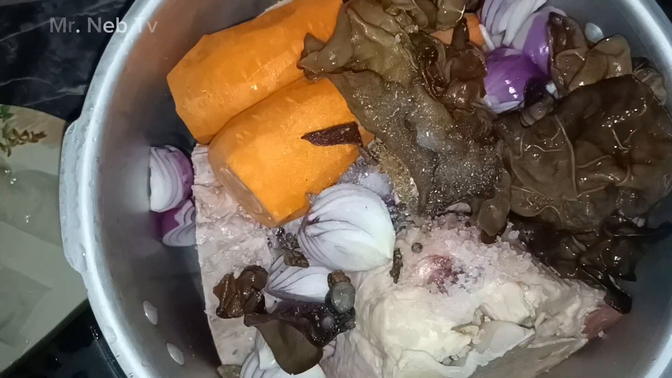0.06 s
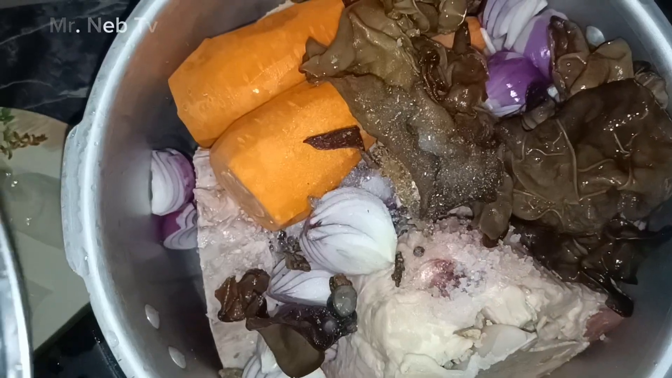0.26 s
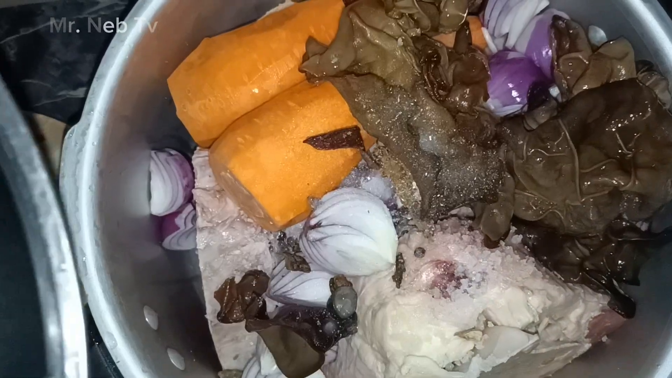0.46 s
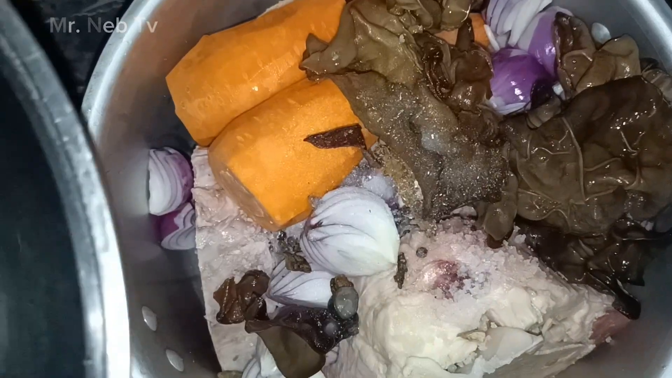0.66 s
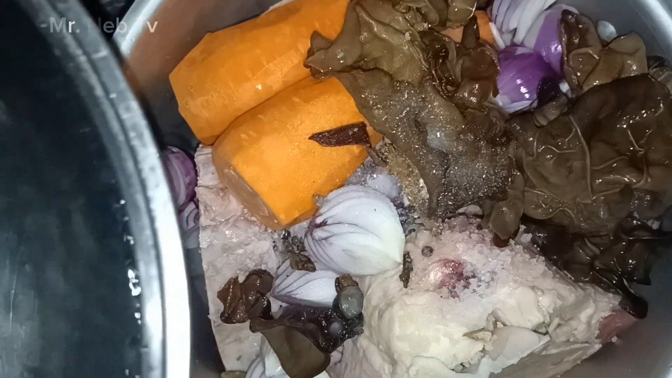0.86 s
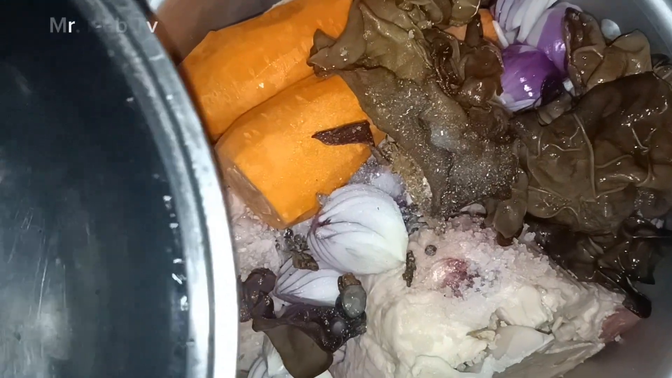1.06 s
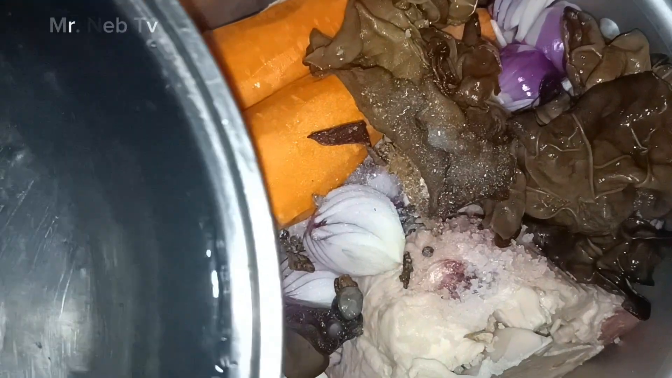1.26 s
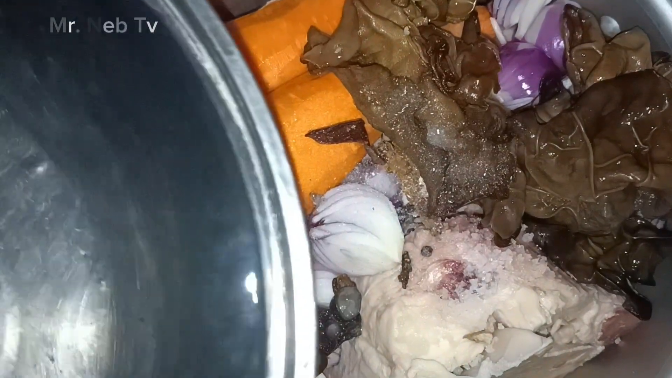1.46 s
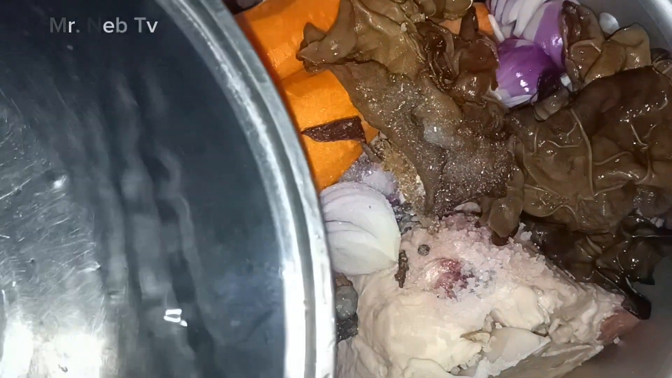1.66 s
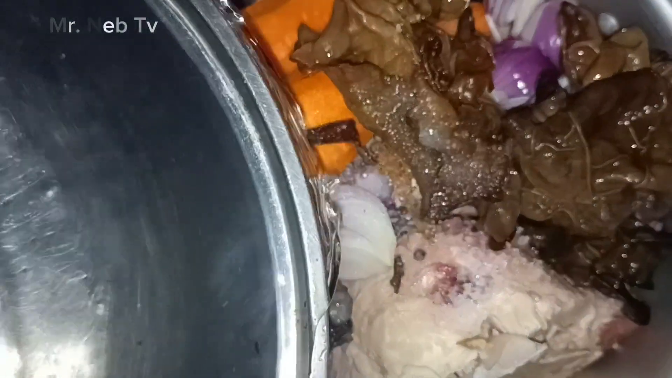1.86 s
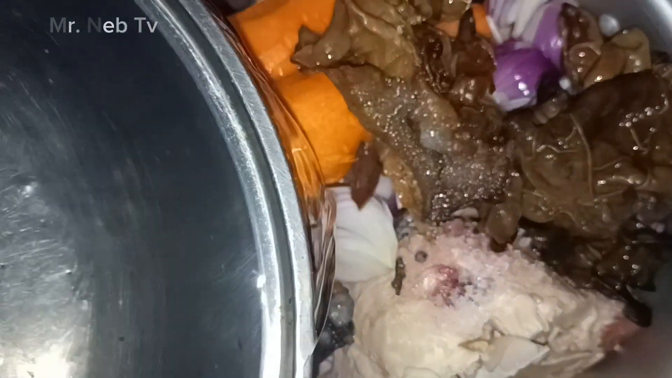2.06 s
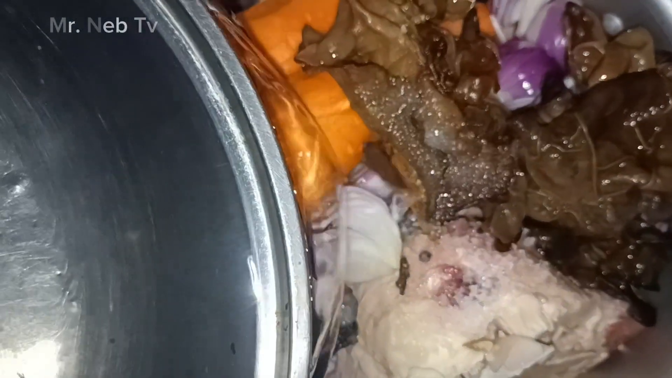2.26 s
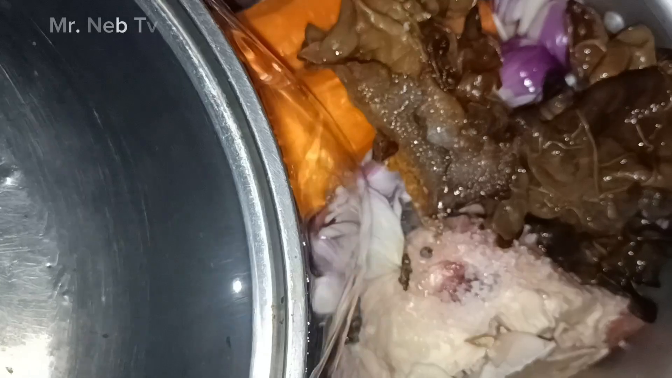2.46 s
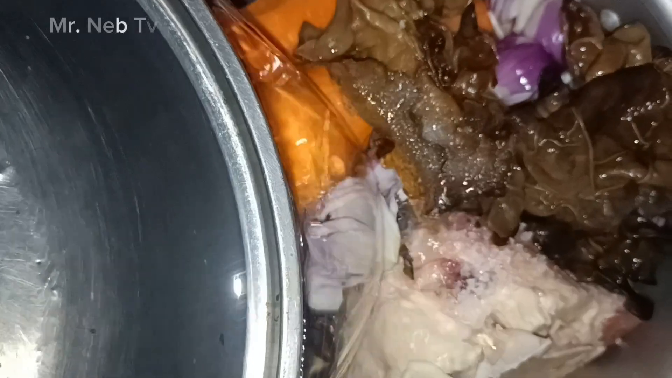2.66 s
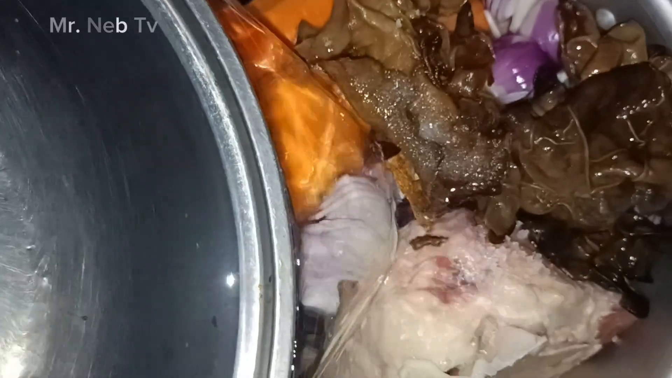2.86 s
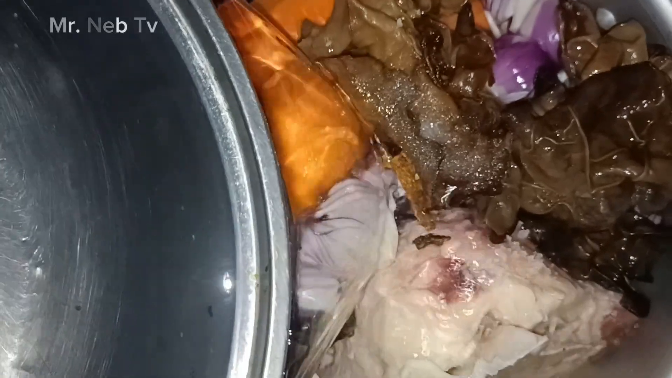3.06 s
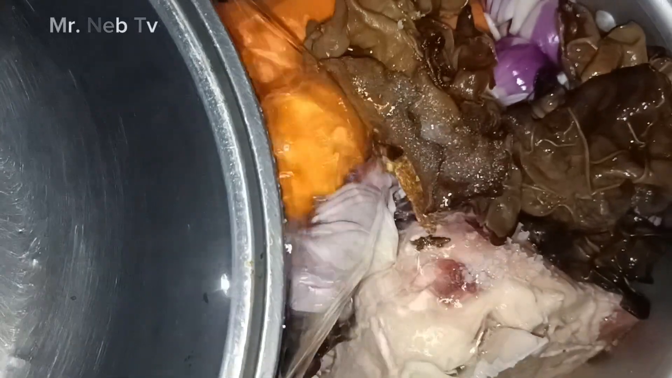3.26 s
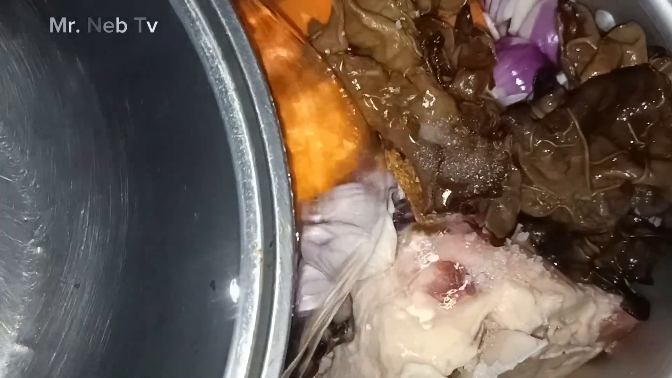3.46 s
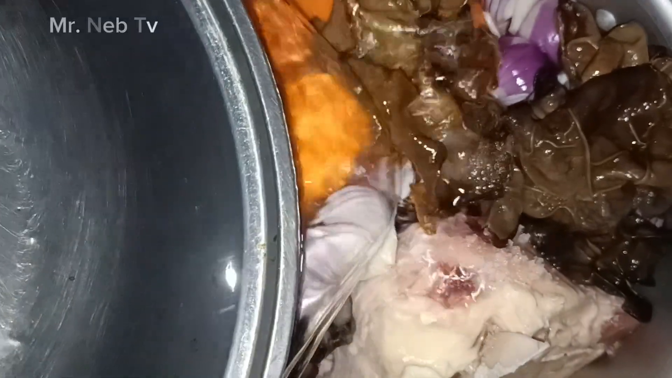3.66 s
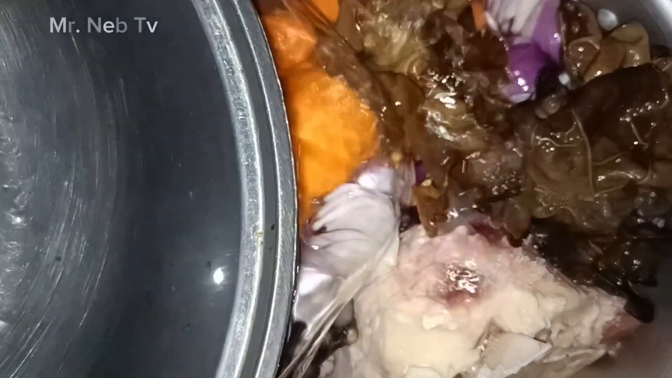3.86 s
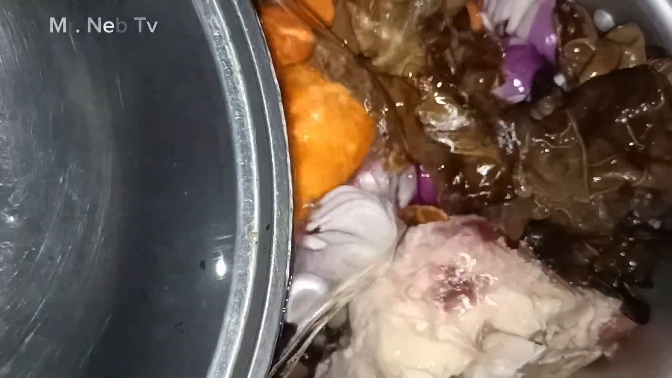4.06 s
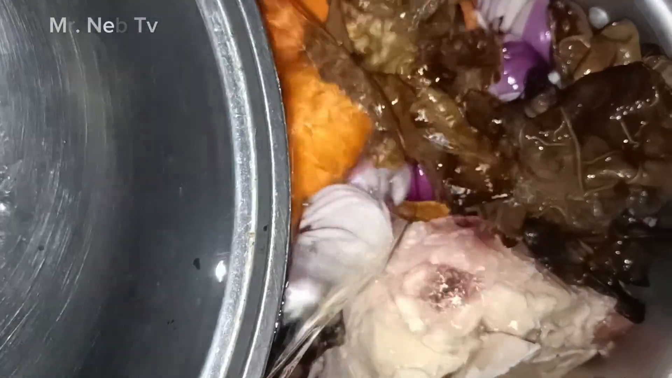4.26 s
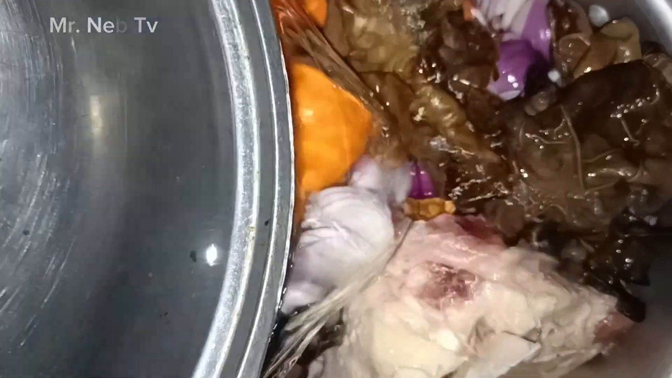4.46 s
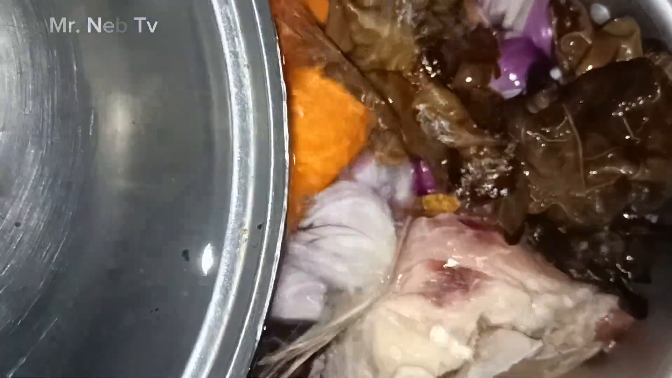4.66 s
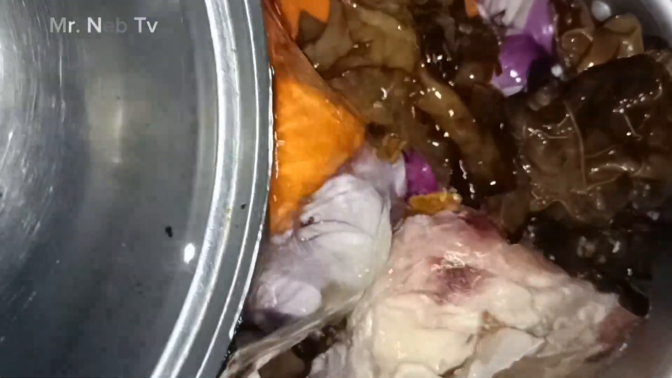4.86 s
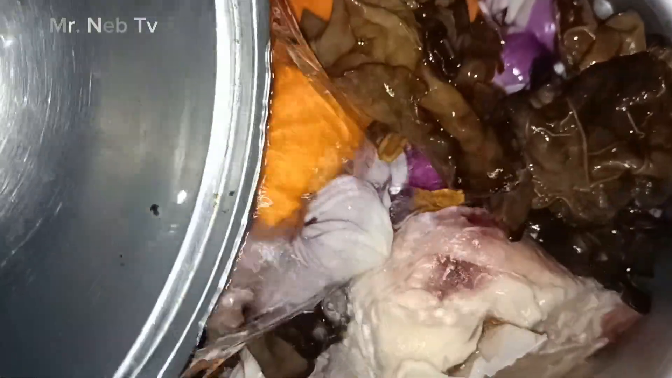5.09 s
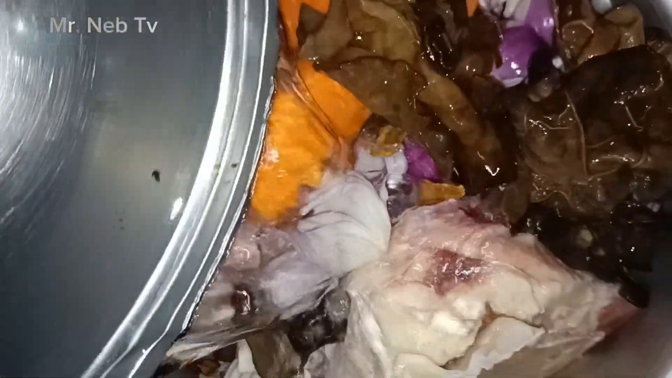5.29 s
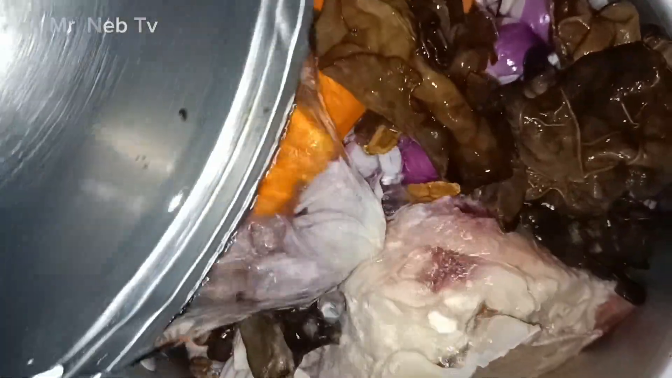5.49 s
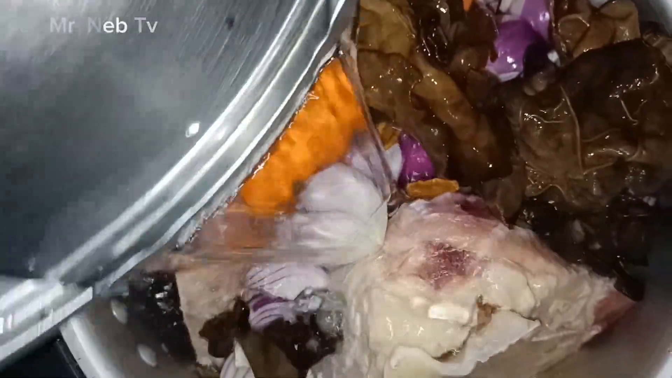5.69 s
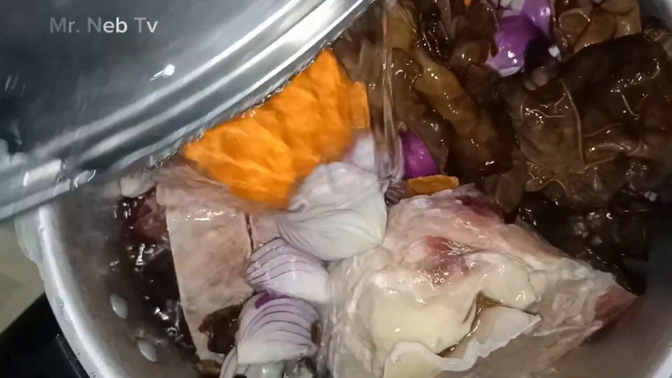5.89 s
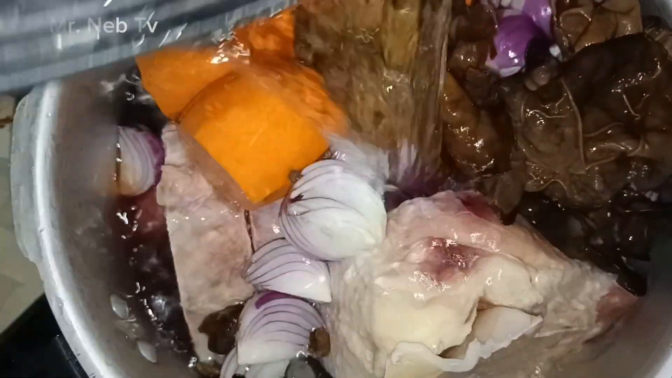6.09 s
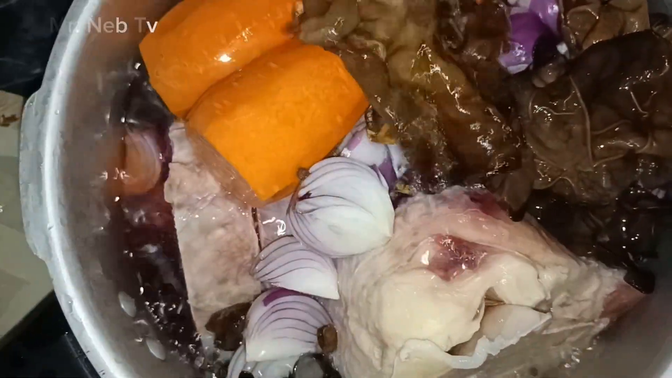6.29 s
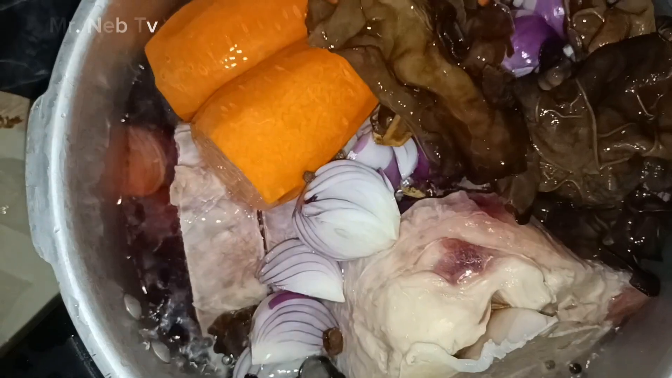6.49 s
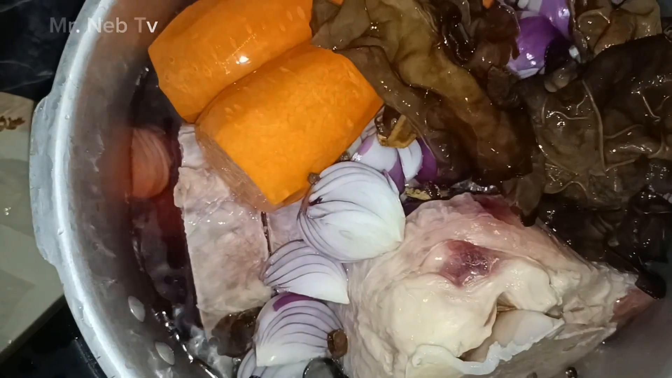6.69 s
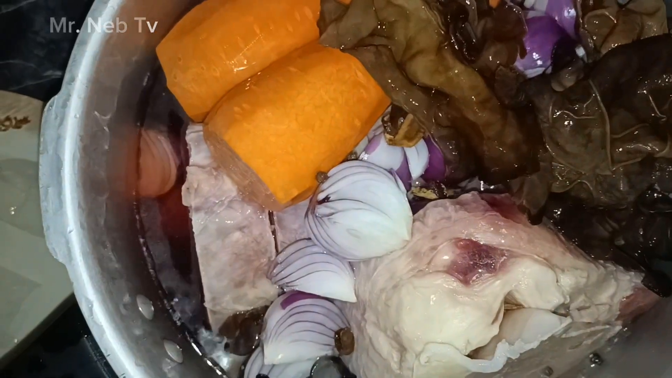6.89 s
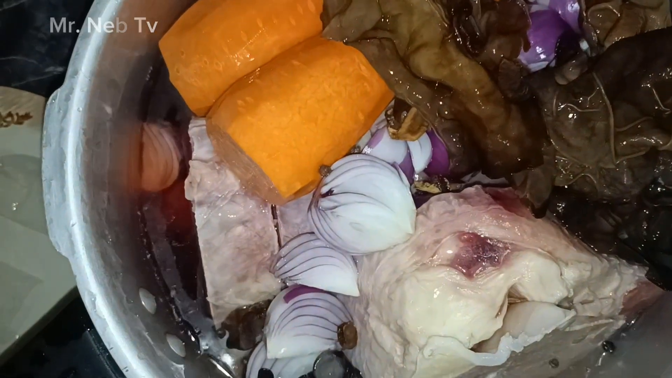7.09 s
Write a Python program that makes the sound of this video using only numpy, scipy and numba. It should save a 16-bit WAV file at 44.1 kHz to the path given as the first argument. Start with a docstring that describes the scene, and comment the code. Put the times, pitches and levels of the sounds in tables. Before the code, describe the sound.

Quiet kitchen air with a faint hiss and distant insects, one chirping quickly in pairs. A metal pot knocks and scrapes against another's rim, then water spills out, first spattering crisply on bare food, then bubbling and gurgling hollowly as a pool forms. The stream thins, gives one last splash and stops, leaving small glugs and a soft fizz. Close phone microphone, small room with light reverberation.

```python
"""In a quiet kitchen, water is tipped from one metal pot into another that is full of meat and vegetables.
The knocked pots ring as damped modes; the stream is swarms of decaying bubble tones and bursts of spray.
Slaps of water drive moving air resonances in the gaps, while low glugs rock from before the pour onwards
and a faint fizz seeps after it. Far insects are narrow noise bands, with one nearer insect chirping in pairs."""
import sys
import numpy as np
from scipy import signal
from scipy.fft import rfft, irfft
from scipy.io import wavfile
from scipy.ndimage import uniform_filter1d
from numba import njit

SR = 44100
rng = np.random.default_rng(int(sys.argv[2]) if len(sys.argv) > 2 else 0)


def materialize(psi):
    """Save the field psi as 16-bit PCM at rate SR to the path in sys.argv[1].

    A 1-D psi becomes a single channel; in a 2-D psi each row is a channel.
    """
    bounded = np.clip(np.atleast_2d(psi).T, -1, 1)
    quanta = np.round(bounded * 32767).astype(np.int16)
    wavfile.write(sys.argv[1], SR, quanta)


N = 314750
TIME = np.arange(N) / SR  # seconds

# Spectrum of the room noise. Each row: frequency in Hz, relative level in dB.
ROOM_COLOUR = [(18, -29), (30, -3), (174, -12), (252, 0), (319, -6.5), (1720, -12), (2200, -6),
               (2750, -10.5), (3870, -16), (5170, -12), (5900, -20), (6900, -11), (7900, -22), (14400, -18),
               (16000, -22)]
# Distant insect choruses. Each row: centre in Hz, width in Hz, level in dB.
INSECT_CHORUSES = [(3006, 35, -57), (3127, 310, -57.5), (3100, 300, -55), (5360, 960, -67.5),
                   (6640, 330, -56)]
CHIRP_FIRST_S, CHIRP_PERIOD_S = .03, .1183
# The two pulses of a chirp. Each row: lag in seconds, peak level in dB.
CHIRP_PULSES = [(0, -51), (.019, -45.5)]

# The body of water rocking in the pot. Each row: middle in seconds, length in seconds, level in dB.
ROCKING_SWELLS = [(2.183, 2.6, -47.5), (3.33, 1.2, -46.5), (4.899, 2.8, -53), (5.441, 0.048, -42.5),
                  (5.719, 0.081, -48), (6.264, 0.18, -52), (6.546, 0.23, -49), (6.595, 1.75, -51.5)]
# Water seeping through the food after the pour. Each row: time in seconds, level in dB.
SEEP_LEVEL = [(5.8, -100), (6.15, -45.5), (6.29, -44.5), (6.4, -49), (6.58, -45), (7.0, -53)]
# Spectral shaping of the glugs and of the seep. Each row: frequency in Hz, relative level in dB.
GLUG_COLOUR = [(100, 9.5), (260, 0.5), (330, -11.5), (480, 1.5)]
SEEP_COLOUR = [(700, -4.5), (1500, -5.5), (2400, -1.5), (3000, 12), (4000, -1.5), (5500, 3.5),
               (9000, -0.5), (15000, 1.5)]

# Vibration modes of the pots. Each row: frequency in Hz, relative level in dB when struck on the rim,
# when bumped on the wall and when the rims slide, 60 dB decay time in seconds before the contact scales it.
POT_MODES = [(115.7, -1, -8.5, -40, 0.11), (158, -7.5, -12, -36.5, .2), (246.4, -7, -12.5, -28, 0.52),
             (317, -12.5, -5.5, -32.5, 1.0), (371, 0.5, -9, -25, .25), (421, 6, -13, -22, 0.12),
             (479, 1, -14, -20, .3), (503, -22, -10, -30, .6), (544, -24, -6, -30, 1.0),
             (621, -5, -18, -25, .3), (761, -15, -11, -30, .45), (842, -12, -14, -30, .45),
             (950, -18, -7, -30, .35), (1190, -18, -12, -30, .23), (1806, -9, -30, -28, .3),
             (1884, -5.5, -28, -26, .32), (2075, -5, -26, -22, .31), (2157, -3, -26, -14, .52),
             (2201, -10, -24, -17, .7), (2273, 1, -17, -17, .17), (2388, -2, -17, -6, .35),
             (2454, -1, -14, -18, .24), (2507, -6, -18, -11, .25), (2545, 0, -14, -18, .22),
             (3225, -11, -30, -17, .3), (3293, -2, -30, -9, .12), (3343, -18, -30, -10.5, .42),
             (3520, -3, -34, -15, 0.16), (3530, -13.5, -30, -27, 0.25), (3880, -8, -29, -23, 0.13),
             (4150, -25, -33, -29, .2), (3920, -6, -30, -15, 0.29), (4450, -1.5, -35, -17, 0.18),
             (4499, -9.5, -34, -18, 0.21), (4635, -16.5, -34, -15.5, 0.33), (5100, -25, -35, -4.5, .15),
             (5520, -28, -34, -16.5, 0.45), (5820, -24, -35, -6, 0.2), (7900, -31.5, -40, -9, 0.2),
             (8170, -17, -40, -10, 0.098)]
# Contacts that ring the pots. Each row: start in seconds, relative level in dB, lowest and highest
# excited frequency in Hz, place, decay time factor, scrape decay constant in seconds,
# relative scrape level in dB, attack time constant in seconds.
CONTACTS = [(1.495, -14.5, 60, 7040, "rim", 0.79, 0.016, 4.5, .003),
            (1.505, -25.5, 1680, 4970, "rim", 0.68, 0.049, 12.5, 0.0022),
            (1.566, -13.5, 98, 620, "rim", 0.24, 0.01, -0.5, 0.0016),
            (1.732, -17, 1900, 9900, "slide", 0.76, 0.047, 1.5, 0.001),
            (1.776, -21.5, 2800, 6970, "slide", 0.42, 0.031, 11, 0.0038),
            (1.823, -23.5, 4020, 6670, "slide", 0.6, 0.013, 12, .004),
            (3.001, -13, 80, 2900, "wall", 0.95, 0.045, -13, 0.0082)]
# Places of contact, in the order of the level columns of the modes.
CONTACT_PLACES = ["rim", "wall", "slide"]
# Spectral shaping of a scrape. Each row: frequency in Hz, relative level in dB.
SCRAPE_SPECTRUM = [(60, -9.5), (130, 15), (200, -2), (400, 10), (680, -4.5), (1100, 3.5), (1500, -10.5),
                   (2400, -1), (2900, -2), (3500, 2), (4500, -5.5), (5200, -5), (8000, -6), (12000, -11)]
# Shifting water and rubbing rims disturb each mode: scale of pitch in Hz, of level in dB, changes per second.
MODE_WOBBLE_HZ, MODE_FLUTTER_DB, WOBBLE_RATE = 2.2, 2.5, 36

# Strength of the stream as the pot is tipped, eased off and emptied. Each row: time in seconds, level in dB.
STREAM_FLOW = [(1.62, -18), (1.664, 4), (1.82, -1.5), (1.92, 2), (2.0, 2), (2.13, -2), (2.28, -1), (2.7, 4),
               (3.3, 1.5), (3.52, -0.5), (3.85, 3), (4.3, 2.5), (4.9, -0.5), (5.42, -12), (5.66, -3),
               (5.75, -7.5), (5.79, 0), (5.931, 4), (6.02, -4), (6.13, -12)]
# Gushes over the rim on top of it. Each row: middle in seconds, length in seconds, extra level in dB.
RIM_GUSHES = [(2.05, 0.15, 13), (2.182, 0.073, 9.5), (2.313, 0.12, 5.5), (2.402, 0.22, 15.5),
              (3.157, 0.11, 0), (3.252, 0.018, 14), (3.608, 0.062, 0.5), (4.117, 0.045, 0),
              (4.183, 0.17, 1.5), (4.277, 0.023, 4.5), (4.73, 0.21, 2), (4.99, 0.037, 4), (5.248, 0.2, 7.5),
              (5.315, 0.056, 3.5)]
GUSH_SPATTER = 0.5  # share of a gush's extra dB that goes into spatter
SPATTER_POWER = 0.65  # spatter goes with flow to this power: a thin stream still spatters
CLUMP_RATE, CLUMP_DB = 36, 2.5  # clumps of the stream: changes per second, scale of their level
# Spectral shaping of bubbles, fizz and spatter. Each row: frequency in Hz, relative level in dB.
BUBBLE_SPECTRUM = [(500, -17), (700, -12), (1150, -0.5), (1450, -3), (1900, -1), (2400, 4), (2900, -1)]
FIZZ_SPECTRUM = [(2000, -29.5), (2600, -3.5), (3500, 9), (4200, 7), (5000, 2), (5900, 9), (7200, 1),
                 (8500, -17)]
SPATTER_SPECTRUM = [(1000, -5.5), (3000, -10), (7000, -9.5), (8200, 3), (10000, -1.5), (12000, -0.5),
                    (13500, -2.5), (15500, -0.5)]
# Levels at a flow of 0 dB, before clumps, gushes and bare food; blips are the few long-ringing bubbles.
BUBBLE_DB, FIZZ_DB, BLIP_DB, SPRAY_DB, PING_DB = -38, -38.5, -44.5, -43, -42
POOL_S, POOL_RISE_S = 2.89, 0.056  # when and how gradually a pool forms under the stream
BARE_BUBBLE_DB, BARE_SPATTER_DB = -9.5, 1.5  # change while the stream still lands on bare food

# Air resonances of two gaps beside the food. Each row: time in seconds, lower and upper pitch in Hz.
GAP_PITCHES = [(2.6, 440, 563), (2.96, 400, 550), (3.25, 330, 546), (3.42, 375, 605), (3.54, 412, 632),
               (3.85, 442, 640), (4.2, 448, 580), (4.5, 440, 585), (4.8, 438, 615), (5.3, 450, 615),
               (5.7, 560, 625), (6.1, 610, 660)]
# Runs of water into the gaps. Each row: start in seconds, hold in seconds, level in dB,
# upper gap relative to lower in dB.
GAP_RUNS = [(2.144, 0.016, -46.5, 30), (2.404, 0.028, -34.5, 3), (2.595, 0.016, -47, -18),
            (2.96, 0.12, -41, -22), (3.03, 0.24, -27, -12), (3.336, 0.12, -27, -0.5),
            (3.514, 0.37, -29.5, -18), (3.895, 0.11, -30, 12), (4.055, 0.37, -35.5, -5),
            (4.462, 0.31, -33.5, -8), (4.945, 0.14, -43.5, 6), (5.296, 0.017, -35.5, -15),
            (5.52, 0.14, -39, 6), (5.948, 0.032, -45, 0)]
GURGLE_ATTACK_S, GURGLE_RELEASE_S = 0.0046, 0.053
TRICKLE_DB = -52.5  # what the flow alone stirs in the lower gap, at a flow of 0 dB
SLAP_DB = -16.5  # relative to the lower gap
# The rocking water changes the size of the gaps: scale as a share of pitch, changes per second.
GAP_WANDER, GAP_WANDER_RATE = 0.064, 14

# Thrown drops. Each row: start in seconds, relative level in dB, lowest frequency in Hz.
THROWN_DROPS = [(1.638, -19, 4500), (1.687, -4.5, 8800), (2.194, -13, 7000), (3.84, -14.5, 6960),
                (4.183, -16, 11000), (5.06, -15, 8600), (5.085, -10.5, 8450), (5.375, -10.5, 13300),
                (5.633, -17.5, 2500), (5.899, -11.5, 2500), (5.912, -17, 10400), (5.929, -4, 11700),
                (5.945, -12.5, 9600), (6.028, -13.5, 7950), (6.044, -8, 7000)]
SPLAT_TOP_HZ, SPLAT_ATTACK_S, SPLAT_DECAY_S = 16200, 0.0005, 0.0033
# Large bubbles. Each row: start in seconds, relative level in dB, initial pitch in Hz, nominal ringing in cycles.
LARGE_BUBBLES = [(1.678, -17, 1900, 22), (2.036, -3, 3550, 30), (2.066, -4, 3350, 34),
                 (2.172, -20.5, 2335, 106), (2.179, -20.5, 836, 39), (2.21, -15.5, 1545, 24),
                 (2.278, -8, 3660, 44), (2.369, -15.5, 1640, 74), (2.371, -11.5, 2460, 55),
                 (2.35, -16, 1000, 12.5), (2.441, -7.5, 1163, 22.4), (2.462, -15, 3990, 100),
                 (2.476, -11.5, 2493, 95), (2.425, -20, 1520, 26), (2.506, -19.5, 960, 16),
                 (2.548, -26, 1430, 30), (2.605, -15.5, 4270, 43), (2.603, -26.5, 670, 30),
                 (2.745, -17.5, 2230, 39), (2.949, -26, 1570, 73), (2.992, -22.5, 2500, 69),
                 (3.006, -21, 1530, 35), (3.067, -11, 1240, 18), (3.062, -16.5, 2270, 56),
                 (3.128, -20.5, 2660, 82), (3.309, -22.5, 1410, 40), (3.101, -16.5, 2450, 72),
                 (3.143, -19, 1490, 58), (3.192, -14, 1625, 50), (3.25, -4, 830, 14.8),
                 (3.367, -7.5, 473, 18.6), (3.285, -22.5, 2120, 120), (3.595, 0, 490, 2.6),
                 (3.606, -19.5, 3120, 86), (3.633, -14, 3440, 58), (3.705, -6.5, 707, 7.6),
                 (3.759, -7.5, 630, 4.1), (3.826, -3.5, 850, 5.7), (3.922, -12, 630, 61),
                 (3.86, -15, 2600, 26), (4.083, -16, 3250, 50), (4.155, -16, 970, 18),
                 (4.282, -11.5, 3220, 18), (4.42, -20, 1436, 42), (4.05, -10, 551, 21),
                 (4.114, -8, 486, 14), (4.135, -10, 3220, 22), (4.212, -19, 2350, 104),
                 (4.234, -7.5, 584, 15.3), (4.464, -17.5, 453, 20), (4.28, -14.5, 1320, 19),
                 (4.588, -4.5, 2750, 11.5), (4.616, -16.5, 1096, 42), (4.696, -11.5, 970, 9.7),
                 (4.972, -20, 1166, 45), (5.118, -12, 1140, 9), (5.195, -17.5, 5400, 94),
                 (5.205, -12, 3160, 13.4), (5.445, -13.5, 1440, 9.5), (5.469, -21.5, 1490, 32),
                 (5.535, -9.5, 1170, 12.7), (5.621, -26.5, 2190, 69), (5.642, -16.5, 2326, 61),
                 (5.662, -21, 2220, 30), (5.698, -25, 2205, 62), (5.8, -20, 1390, 27),
                 (5.86, -17.5, 5420, 58), (5.915, -19.5, 5460, 80), (5.949, -19, 3700, 51),
                 (6.044, -15.5, 3630, 20), (5.965, -23, 1270, 25), (5.99, -20, 780, 4.9),
                 (6.094, -18.5, 6000, 33), (6.271, -34.5, 5700, 110), (5.929, -14.5, 1770, 26)]
# Sheets of water breaking on the food. Each row: middle in seconds, length in seconds, level in dB,
# lowest and highest frequency in Hz.
WATER_SHEETS = [(2.25, 0.047, -21.5, 3580, 13400), (2.32, 0.073, -22, 3800, 14000),
                (2.384, 0.087, -23.5, 2150, 9200), (2.42, 0.031, -25, 2950, 8000),
                (2.473, 0.034, -27, 2490, 5950), (2.58, 0.016, -22.5, 2200, 14100),
                (5.21, 0.039, -40, 4500, 7460), (5.348, 0.054, -33, 2920, 7200),
                (5.788, 0.059, -34.5, 2820, 15000), (4.887, 0.046, -35, 3000, 14000),
                (5.908, 0.072, -32.5, 2510, 6900), (5.979, 0.015, -28.5, 4960, 15000)]

# Resonances of the air in the pot above the food. Each row: frequency in Hz, sharpness Q, gain in dB.
POT_AIR_MODES = [(991, 17, -3.5), (1147, 37, -3.5), (2070, 31, -12), (2330, 10, -15.5), (4100, 46, -22.5),
                 (5230, 42, -23)]
# Reflections off the wall: level in dB, 60 dB decay time, changes of the landing spot per second.
POT_ECHO_DB, POT_T60_S, LANDING_RATE = -8, 0.05, 14
STOP_S, TOP_HZ = 6.997, 16000  # the sound is cut off at this time; upper edge of the passband


def undb(db):
    """Amplitude gain is ten to the power of dB over twenty."""
    return 10 ** (np.asarray(db) / 20)


def unit(x):
    """Normalization of mean power: scale to rms 1."""
    return x / np.sqrt(np.mean(x ** 2) + 1e-20)


def colour(x, points):
    """Minimum-phase filtering: the folded cepstrum makes a causal response through the given (Hz, dB) points."""
    hz, db = np.transpose(points)
    size = 4096
    grid_hz = np.fft.rfftfreq(size, 1 / SR)
    grid_db = np.interp(np.log(grid_hz + 1), np.log(hz), db)
    cepstrum = irfft(np.log(undb(grid_db)))
    cepstrum[1:size // 2] *= 2
    cepstrum[size // 2 + 1:] = 0
    impulse = irfft(np.exp(rfft(cepstrum)))
    return signal.fftconvolve(x, impulse)[:len(x)]


def band(x, lo_hz, hi_hz, order=2):
    """Band-pass filtering between two edges, kept inside the audible range of the sampling."""
    edges = [max(lo_hz, 10), min(hi_hz, SR / 2 - 1000)]
    return signal.sosfilt(signal.butter(order, edges, "band", fs=SR, output="sos"), x)


def add(out, s, x):
    """Superposition: mix x into out at time s."""
    i = int(s * SR)
    out[i:i + len(x)] += x[:N - i]


def hump(middle_s, length_s):
    """Squared-cosine envelope: a smooth rise to 1 and fall, over the given length."""
    return np.cos(np.pi * np.clip((TIME - middle_s) / length_s, -.5, .5)) ** 2


def walk(rate, size):
    """Slow random modulation: values held for 1 / rate seconds and smoothed into each other."""
    hold = int(SR / rate)
    steps = rng.standard_normal(size)[np.arange(size) // hold]
    return uniform_filter1d(steps, hold)


@njit
def rings(times, sizes, hz, cycles, glide, swell):
    """Damped oscillation: sines swell with a constant in cycles and die by 60 dB while their pitch glides up."""
    out = np.zeros(N)
    for k in range(len(times)):
        start, length, turns = int(times[k] * SR), int(cycles[k] * SR / hz[k]), 0.
        for i in range(min(length, N - start)):
            age = i / length
            turns += hz[k] * (1 + glide * age) / SR
            envelope = np.exp(-6.9 * age) * (1 - np.exp(-turns / swell))
            out[start + i] += sizes[k] * envelope * np.sin(2 * np.pi * turns)
    return out


def swarm(rate, lo_hz, hi_hz, cycles, spread_db, glide, even_s=0.086):
    """Random bubble resonances, many faint and a few strong, divided by their local power for an even flow."""
    when, size, place, life = rng.random((40000, 4))[:int(rate * N / SR)].T
    hz = lo_hz * (hi_hz / lo_hz) ** place
    sizes = undb(-spread_db * np.log(size + .012)) * np.sqrt(hz)
    x = rings(when * N / SR, sizes, np.minimum(hz, SR / 2), cycles * (.5 + life), float(glide), 0.52)
    span = int(even_s * SR)
    power = uniform_filter1d(uniform_filter1d(x ** 2, span), span)
    return x / np.sqrt(np.abs(power) + 1e-3 * np.mean(power))


@njit
def cavity(x, hz, q):
    """Second-order resonance of enclosed air, whose pitch may move from sample to sample."""
    y, b, low = np.empty(len(x)), 0., 0.
    for i in range(len(x)):
        g = np.tan(np.pi * hz[i] / SR)
        v = (b + g * (x[i] - low)) / (1 + g * (g + 1 / q))
        b, low, y[i] = 2 * v - b, low + 2 * g * v, v / q
    return y


def reflections(x, t60, delay_s, top_hz):
    """Reverberation: a dense, exponentially decaying tail of echoes with unit energy."""
    t = TIME[:int((t60 + delay_s) * SR)]
    noise = band(rng.standard_normal(SR)[:len(t)], 150, top_hz, order=1)
    tail = noise * undb(-60 * t / t60) * (t > delay_s)
    return signal.oaconvolve(x, tail / np.linalg.norm(tail))[:N]


def kitchen():
    """Broadband room noise is shaped by its spectrum; a narrow band of noise forms a soft low drone."""
    air = unit(colour(rng.standard_normal(N), ROOM_COLOUR))
    drone = unit(band(rng.standard_normal(N), 232, 292, order=4))
    return undb(-53.5) * air + undb(-65.5) * drone


def insects():
    """Many far callers blur into narrow noise bands; one nearer insect chirps in pairs of falling pulses."""
    out = np.zeros(N)
    for hz, width, db in INSECT_CHORUSES:
        chorus = band(rng.standard_normal(N), hz - width / 2, hz + width / 2)
        out += undb(db) * unit(chorus)
    age = np.linspace(0, 1, int(.011 * SR))
    for s in np.arange(CHIRP_FIRST_S, N / SR - .1, CHIRP_PERIOD_S):
        for lag, db in CHIRP_PULSES:
            hz = 7450 - 550 * age + 700 * rng.standard_normal(len(age))  # falling, with a rough pitch
            pulse = np.sin(np.pi * age) * np.sin(2 * np.pi * np.cumsum(hz) / SR)
            start = abs(s + lag - .004 + 0.00011 * rng.standard_normal())
            add(out, start, undb(db) * pulse)
    return out


def handling():
    """Friction and impact as the full pot is lifted: a soft brush of band noise, then a dull damped bump."""
    brush = unit(band(rng.standard_normal(N), 4400, 5900)) * np.exp(-((TIME - .21) / 0.062) ** 2)
    bump = rings(np.array([.75]), undb([-47]), np.array([150.]), np.array([7.]), 0., 0.13)
    return undb(-55.5) * brush + bump


def settling():
    """Low bubble resonances swell as the water rocks; a dense fine swarm fizzes as it seeps through the food."""
    glugs = swarm(rate=260, lo_hz=242.0, hi_hz=454.5, cycles=38.0, spread_db=0.5, glide=0.052)
    glugs = unit(colour(glugs, GLUG_COLOUR))
    seep = swarm(rate=5500, lo_hz=1000, hi_hz=16000, cycles=35, spread_db=1.5, glide=.05)
    seep = unit(colour(seep, SEEP_COLOUR))
    rocking = sum(undb(db) * hump(s, length) for s, length, db in ROCKING_SWELLS)
    seep_gain = undb(np.interp(TIME, *np.transpose(SEEP_LEVEL)))
    return glugs * rocking + seep_gain * seep


def knocks():
    """Modal vibration: the place of contact sets how strongly each mode answers, and the load makes it waver."""
    out, t = np.zeros(N), TIME[:SR]
    hz, *place_db, t60 = np.transpose(POT_MODES)[:, :, None]
    bend, flutter = (np.array([walk(WOBBLE_RATE, size=SR) for _ in POT_MODES]) for _ in range(2))
    # neighbouring modes swing in opposite directions
    sign = (-1) ** np.arange(len(hz))[:, None]
    phase = 2 * np.pi * np.cumsum(hz + MODE_WOBBLE_HZ * bend, axis=1) / SR
    swing = sign * undb(MODE_FLUTTER_DB * flutter) * np.sin(phase)
    for s, level_db, lo_hz, hi_hz, place, ring, scrape_s, scrape_db, attack_s in CONTACTS:
        mode_gain = undb(place_db[CONTACT_PLACES.index(place)])
        decay = np.exp(-np.log(1000) / (t60 * ring) * t)
        body = (mode_gain * decay * swing).sum(axis=0)
        scrape = unit(colour(rng.standard_normal(SR), SCRAPE_SPECTRUM)) * np.exp(-t / scrape_s)
        blow = (body + undb(scrape_db - 3.5) * scrape) * (1 - np.exp(-t / attack_s))
        add(out, s, undb(level_db) * band(blow, lo_hz, hi_hz))
    return out


def flow():
    """Source strength of the stream, as a gain; it is silent before and after the pour."""
    s, db = np.transpose(STREAM_FLOW)
    gate = np.interp(TIME, [s[0] - .01, s[0], s[-1], s[-1] + 0.022], [0, 1, 1, 0])
    return undb(np.interp(TIME, s, db)) * gate


def clumps():
    """Random amplitude modulation: the stream lands in stronger and weaker clumps."""
    return undb(CLUMP_DB * walk(CLUMP_RATE, size=N))


def stream():
    """Trapped air rings as bubbles while impacts spray; as a pool forms, bubbles gain and spatter loses."""
    bubbles = swarm(rate=950, lo_hz=617.0, hi_hz=2776, cycles=64, spread_db=4.5, glide=0.28)
    bubbles = unit(colour(bubbles, BUBBLE_SPECTRUM))
    fizz = swarm(rate=3000, lo_hz=2383, hi_hz=7130, cycles=57, spread_db=5.0, glide=0.13)
    fizz = unit(colour(fizz, FIZZ_SPECTRUM))
    blips = unit(swarm(rate=70, lo_hz=1211, hi_hz=4200, cycles=100, spread_db=3.0, glide=.16, even_s=0.2))
    # the envelope of a swarm of drops gates noise into short bursts of spray
    drops = swarm(rate=750, lo_hz=2147, hi_hz=4890, cycles=44, spread_db=5.0, glide=0)
    spray = np.abs(signal.hilbert(drops)) * rng.standard_normal(N)
    spray = unit(colour(spray, SPATTER_SPECTRUM))
    # the smallest bubbles ping
    pings = swarm(rate=1900, lo_hz=7405, hi_hz=15960, cycles=120, spread_db=5.5, glide=0.034)
    pings = unit(colour(pings, SPATTER_SPECTRUM))

    bare = .5 - .5 * np.tanh((TIME - POOL_S) / POOL_RISE_S)  # 1 on bare food, 0 on the pool
    gush_db = sum(db * hump(s, length) for s, length, db in RIM_GUSHES)
    trapped_air = undb(BUBBLE_DB + BARE_BUBBLE_DB * bare) * bubbles + undb(FIZZ_DB) * fizz + undb(BLIP_DB) * blips
    spatter = (undb(SPRAY_DB) * spray + undb(PING_DB) * pings) * undb(BARE_SPATTER_DB * bare)
    poured_air = flow() * trapped_air * undb(gush_db)
    poured_spatter = flow() ** SPATTER_POWER * spatter * undb(GUSH_SPATTER * gush_db)
    return clumps() * (poured_air + poured_spatter)


def gurgle():
    """Forced air resonance: irregular slaps drum two gaps; each run of water swells, holds and drains away."""
    s, lower_hz, upper_hz = np.transpose(GAP_PITCHES)
    slaps = swarm(rate=450, lo_hz=320, hi_hz=875, cycles=2.16, spread_db=5.0, glide=0)
    lower_wander, upper_wander = (1 + GAP_WANDER * walk(GAP_WANDER_RATE, size=N) for _ in range(2))
    lower = unit(cavity(slaps, np.interp(TIME, s, lower_hz) * lower_wander, 14.))
    upper = unit(cavity(slaps, np.interp(TIME, s, upper_hz) * upper_wander, 20.))
    out = undb(TRICKLE_DB) * flow() * lower
    for start, hold, db, upper_db in GAP_RUNS:
        attack = np.clip((TIME - start) / GURGLE_ATTACK_S, 0, 1)
        release = np.exp(-np.maximum(TIME - start - hold, 0) / GURGLE_RELEASE_S)
        drumming = unit(lower + undb(upper_db) * upper + undb(SLAP_DB) * unit(slaps))
        out = out + undb(db) * attack * release * drumming
    return band(out, 352, 794, order=3)


def splats():
    """Impulsive impact: thrown drops slap the food and the wall in a few milliseconds of spray."""
    out, t = np.zeros(N), TIME[:SR // 20]
    envelope = np.exp(-t / SPLAT_DECAY_S) * (1 - np.exp(-t / SPLAT_ATTACK_S))
    for start, level_db, lo_hz in THROWN_DROPS:
        spray = band(rng.standard_normal(len(t)), lo_hz, SPLAT_TOP_HZ)
        add(out, start, undb(level_db) * .5 * unit(spray) * envelope)
    return out


def plops():
    """Bubble resonance: large bubbles pinch off with a small splash and ring with rising pitch."""
    s, db, hz, cycles = np.array(LARGE_BUBBLES, float).T.copy()
    out, t = rings(s, undb(db + 4.0), hz, cycles, 0.11, 1.16), TIME[:SR // 20]
    envelope = np.exp(-t / 0.023) * (1 - np.exp(-t / 0.0012))
    for start, level_db, pitch_hz, _ in LARGE_BUBBLES:
        splash = band(rng.standard_normal(len(t)), .7 * pitch_hz, 1.8 * pitch_hz, order=1)
        add(out, start, undb(level_db - 22.5) * unit(splash) * envelope)
    return band(out, 380, 19000)


def splashes():
    """Many sources at once: a sheet of water breaks on the food in a dense rush of short-lived bubbles."""
    rush = swarm(rate=8100, lo_hz=1500, hi_hz=14700, cycles=17.0, spread_db=3.5, glide=0.036)
    out = np.zeros(N)
    for s, length, db, lo_hz, hi_hz in WATER_SHEETS:
        out += undb(db) * hump(s, length) * unit(band(rush, lo_hz, hi_hz))
    return out


def inside_pot(x):
    """Enclosed air resonates, and the wall echoes keep changing as the water lands on different spots."""
    shares = np.array([walk(LANDING_RATE, size=N) for _ in range(6)])  # one for each landing spot
    shares = shares / np.linalg.norm(shares, axis=0)
    echoes = sum(reflections(x * share, t60=POT_T60_S, delay_s=0.001155, top_hz=9900) for share in shares)
    air = sum(undb(db) * cavity(x, np.full(N, float(hz)), float(q)) for hz, q, db in POT_AIR_MODES)
    return x + air + undb(POT_ECHO_DB) * echoes


def scene():
    """Superposition and reverberation: the pour echoes inside the pot, then all near sound but the handling
    rings faintly in the kitchen."""
    pour = stream() + gurgle() + splats() + plops() + splashes()
    near = settling() + knocks() + inside_pot(pour)
    walls = undb(-14.0) * reflections(near, t60=0.66, delay_s=0.0055, top_hz=6600)
    return (kitchen() + insects() + handling() + near + walls)[None]


def record(dry):
    """Band limiting and overload of a phone: thin deep bass, clipped peaks, a stop near the end, no top."""
    x = signal.sosfilt(signal.butter(2, 42, "high", fs=SR, output="sos"), dry)
    x = np.clip(x, -1, 1) * (TIME < STOP_S)
    return signal.sosfilt(signal.ellip(10, .2, 80, TOP_HZ, fs=SR, output="sos"), x)


dry = scene()
out = record(dry)
materialize(out)
```